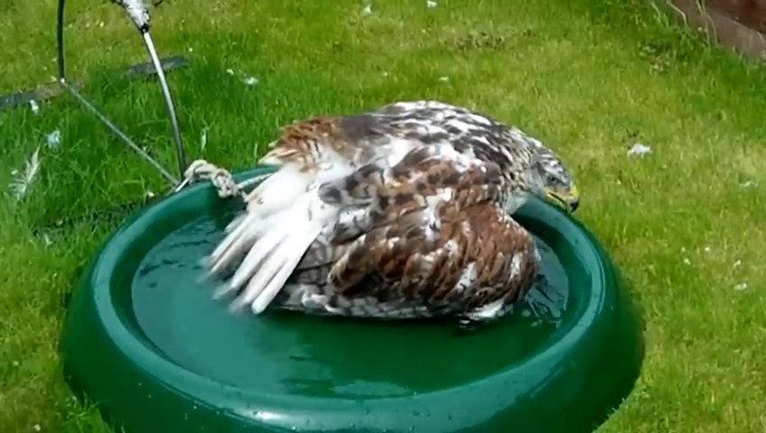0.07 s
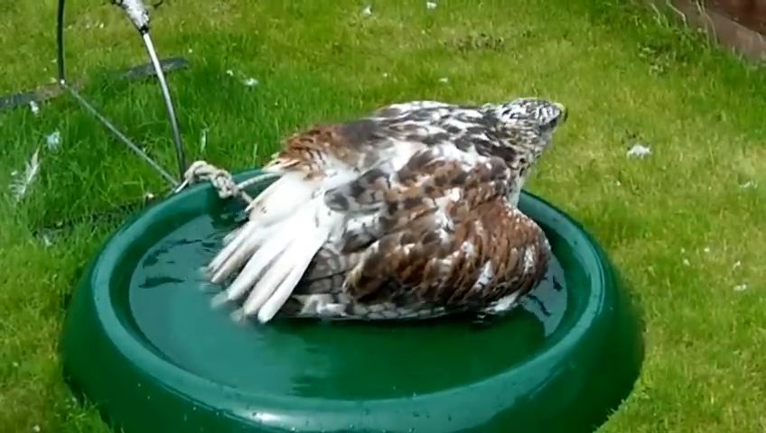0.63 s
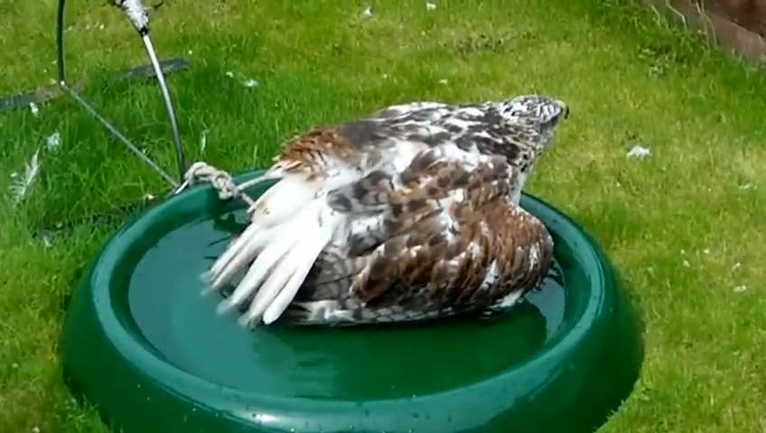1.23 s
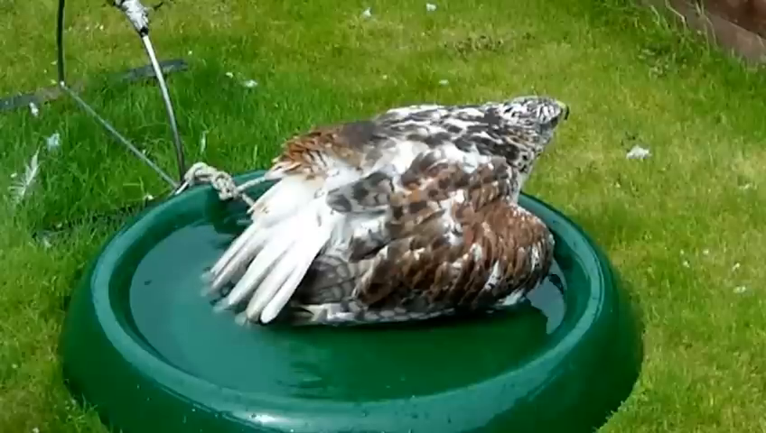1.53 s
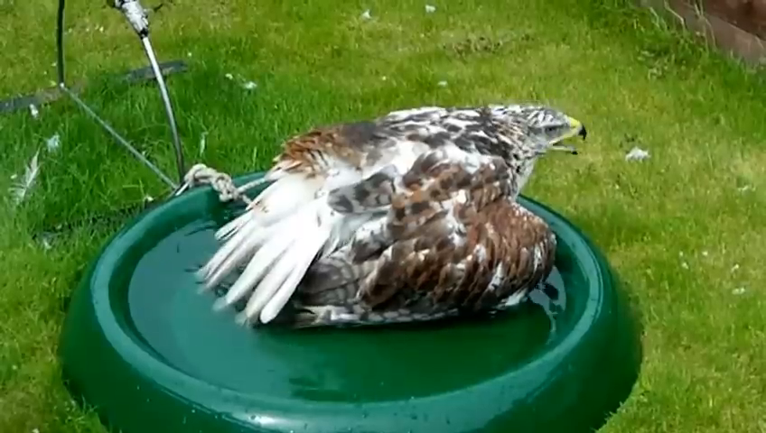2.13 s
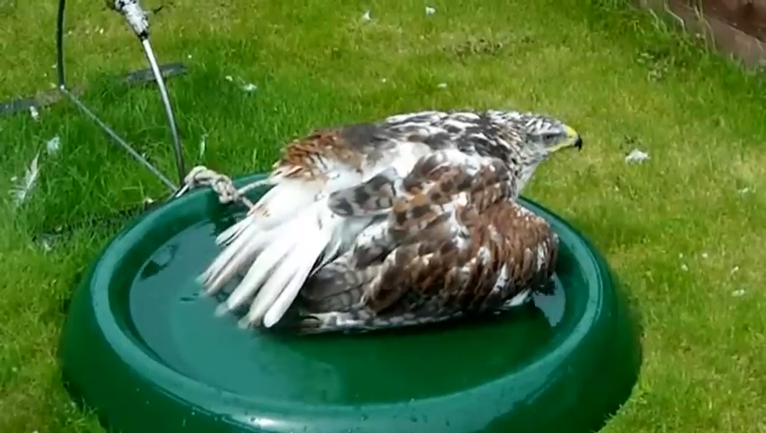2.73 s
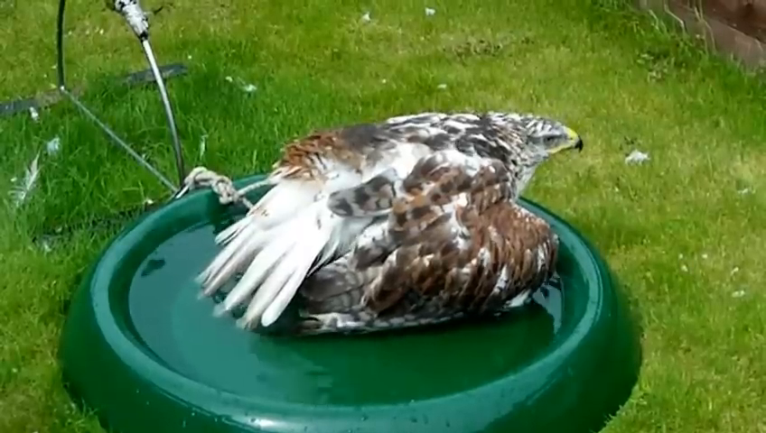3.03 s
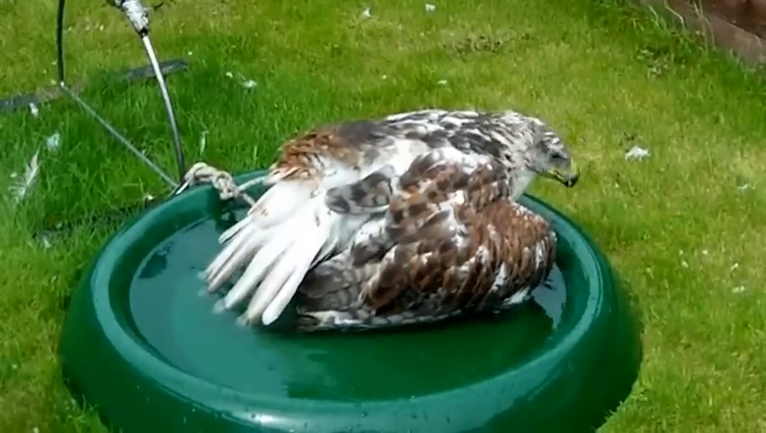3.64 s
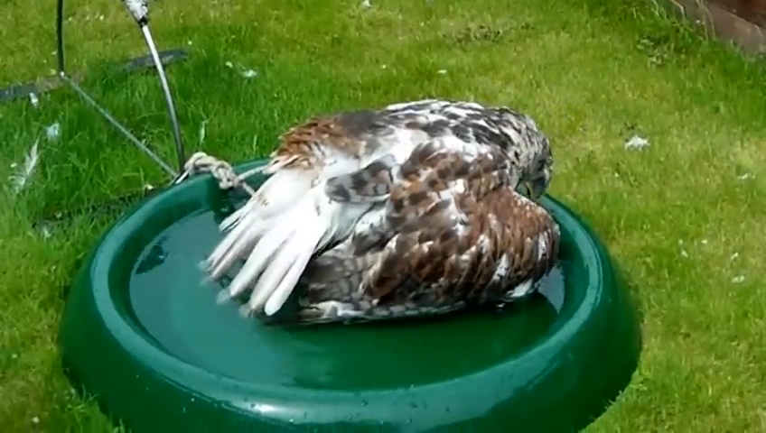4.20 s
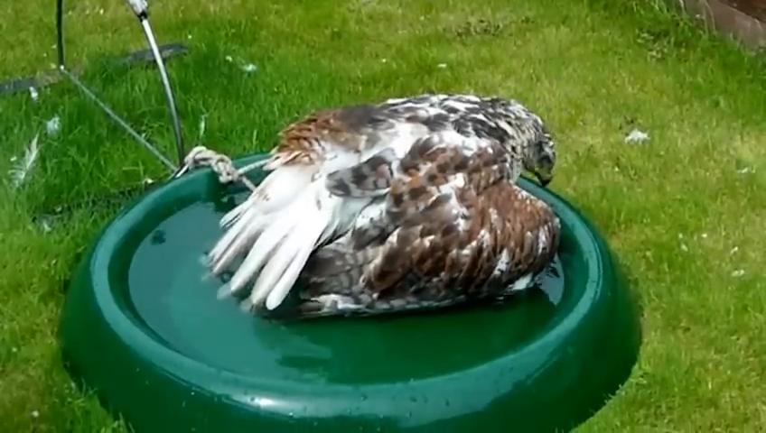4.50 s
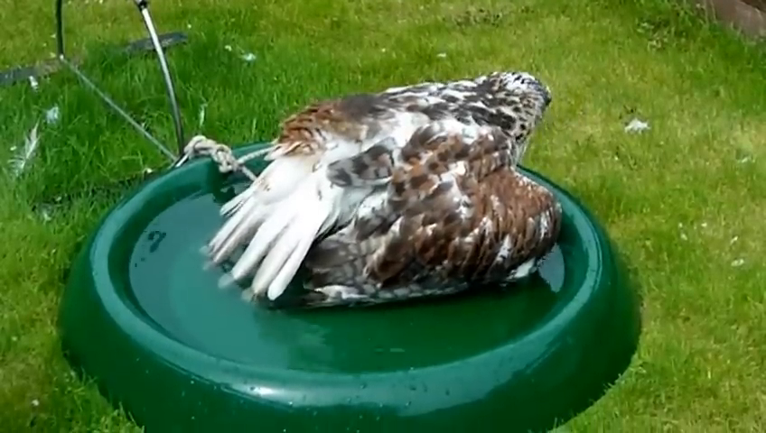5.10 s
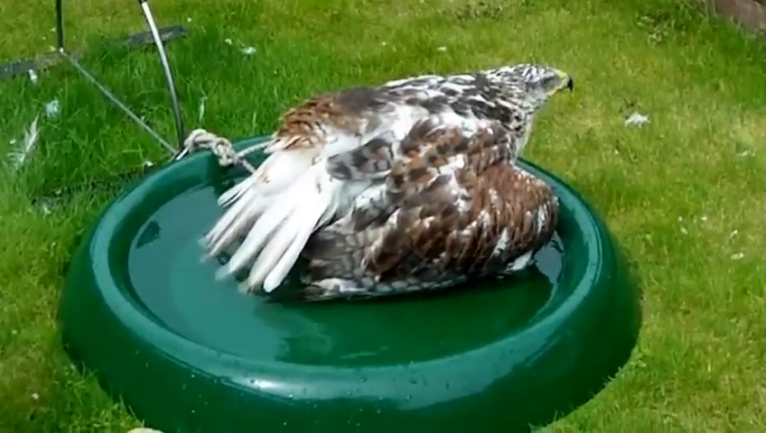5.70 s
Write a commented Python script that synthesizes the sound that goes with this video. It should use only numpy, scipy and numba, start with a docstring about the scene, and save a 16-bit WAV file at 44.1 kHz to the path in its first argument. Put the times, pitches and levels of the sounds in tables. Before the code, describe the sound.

A hawk calls four times on a garden lawn. Each call is a thin, high squeal that rises, turns raspy and breaks about an octave down into a short, loud yelp. Just after the second call a small songbird gives one faint, buzzy chirp. The hawk sounds close and clear, with a slight quick echo, over a faint steady open-air hiss and low rumble.

```python
"""A hawk calls four times from a bath on a garden lawn. Each call is a thin rising squeal that doubles
its period, turns to a rasp and breaks about an octave down into a short loud yelp. A small songbird
chirps once, a whistle with a buzzing tail. Fence and house throw the calls back over a bed of faint
open-air hiss and low rumble."""
import sys
import numpy as np
from scipy import signal
from scipy.fft import rfft, irfft, next_fast_len
from scipy.io import wavfile
from numba import njit

SR = 44100
rng = np.random.default_rng(int(sys.argv[2]) if len(sys.argv) > 2 else 0)


def dump(signal):
    """Clip the signal to [-1, 1] and save it as 16-bit WAV at the path in sys.argv[1]."""
    limited = np.clip(np.atleast_2d(signal).T, -1, 1)
    pcm = np.round(limited * 32767).astype(np.int16)
    wavfile.write(sys.argv[1], SR, pcm)


N = 262395
T = np.arange(N) / SR


def hawk():
    """Four calls from one throat, each a squeal, a register break and a yelp."""
    textures = call_textures()
    out = np.zeros(N)
    for call in zip(SQUEALS, DOUBLINGS, RASPS, OCTAVES, SHRILLS):
        out += squeal(*call, textures)
    for break_row, yelp_row in zip(BREAKS, YELPS):
        out += register_break(break_row, yelp_s=yelp_row[0]) + yelp(yelp_row, textures["jitter"])
    return out


# pitch and level envelope of each squeal: t/s, f/Hz, level/dB
SQUEAL_1 = [(0.115, 2704, -52), (0.141, 2830, -41.5), (0.219, 3087, -30.5), (0.247, 3102, -25),
            (0.265, 3254, -18.5), (0.315, 3450, -23.5), (0.345, 3753, -29), (0.366, 3414, -36)]
SQUEAL_2 = [(1.974, 2617, -52), (2.018, 2625, -48), (2.056, 2754, -56), (2.122, 2838, -40.5),
            (2.172, 3036, -53), (2.242, 3090, -28.5), (2.256, 3240, -38.5), (2.324, 3744, -26.5),
            (2.348, 3660, -37)]
SQUEAL_3 = [(3.159, 2615, -55), (3.211, 2630, -51.5), (3.295, 2914, -43), (3.341, 3226, -52),
            (3.371, 3226, -35.5), (3.469, 3669, -20.5), (3.499, 3788, -33), (3.519, 3770, -20.5),
            (3.538, 3900, -53)]
SQUEAL_4 = [(4.097, 2804, -48), (4.149, 2806, -36), (4.191, 3053, -41), (4.213, 3139, -25.5),
            (4.275, 3368, -32), (4.299, 3700, -25), (4.329, 4150, -36), (4.355, 4090, -28),
            (4.374, 3920, -38)]
SQUEALS = SQUEAL_1, SQUEAL_2, SQUEAL_3, SQUEAL_4
# period doubling, which adds half-tones at 1.5 and 0.5 times the pitch:
# fully in t/s, attack/s, level/dB, fade/(dB/s), lower half-tone re upper/dB, phase slip/turns
DOUBLINGS = [(.27, 0.038, -34, 110, -18, .05), (2.203, 0.02, -41, 74, -6, .035),
             (3.385, 0.074, -41.5, 89, -10.5, 0.054), (4.3, 0.045, -46, 45, -16, 0.12)]
# rasp up to the break: fully in t/s, first level/dB, last level/dB, roughness/(0-1)
RASPS = [(.215, -40.5, -36.5, 0.76), (2.27, -41, -39, 0.8), (3.415, -44, -34.5, 0.65),
         (4.295, -39, -49, .9)]
# octave overtone: brightest t/s, first level/dB, brightest level/dB, last level/dB
OCTAVES = [(.245, -59, -43, -62), (2.315, -62, -43, -58), (3.47, -55.5, -40.5, -55), (4.25, -54, -32, -87)]
# shrill top layer: fully in t/s, first level/dB, level at the octave's peak/dB, last level/dB
SHRILLS = [(.2, -57, -47.5, -64), (2.19, -53, -45.5, -59), (3.35, -56, -50, -51), (4.205, -56, -57, -70)]


def squeal(curve, doubling_row, rasp_row, octave_row, shrill_row, textures,
           waver_share=.0037, strain_share=.0034, jitter_share=.03, shimmer_share=1.1,
           flutter_db=3, rush_db=-5, hoarse_db=7):
    """High register of the syrinx: a whistle whose cycles alternate, then scatter as pressure grows."""
    doubling_s, attack_s, half_db, fade_db_per_s, lower_db, slip_turns = doubling_row
    rasp_s, *rasp_db, roughness = rasp_row
    brightest_s, *octave_db = octave_row
    shrill_s, *shrill_db = shrill_row
    start_s, end_s = curve[0][0], curve[-1][0]
    hz, db = controls(curve)
    # layer envelopes
    doubled = ramp(doubling_s - attack_s, attack_s)
    half = doubled * undb(half_db - fade_db_per_s * (T - doubling_s))
    rasp = fade_in(rasp_s, .036) * undb(np.interp(T, [rasp_s, end_s], rasp_db))
    octave = undb(np.interp(T, [start_s, brightest_s, end_s], octave_db))
    shrill = fade_in(shrill_s, .018) * undb(np.interp(T, [shrill_s, brightest_s, end_s], shrill_db))
    # the rasp shakes the whistle's pitch and level
    grit = np.minimum(rasp / undb(db), .4)
    jitter = jitter_share * roughness * grit * textures["jitter"]
    shimmer = shimmer_share * roughness * grit * textures["shimmer"]
    waver = (waver_share + strain_share * doubled) * textures["waver"]
    phase = turn(hz * (1 + waver + jitter))
    # the alternating cycles lock only loosely, so the half-tones are hoarser than the whistle
    slip = 2 * np.pi * slip_turns * textures["slip"]
    halves = np.sin(1.5 * (phase + slip)) + undb(lower_db) * np.sin(.5 * (phase + slip))
    top = shrill_partials(hz, phase + doubled * slip / 2, doubled)
    partials = octave * np.sin(2 * phase) + half * halves + shrill * top
    tone = undb(db) * np.sin(phase) + undb(flutter_db * textures["flutter"]) * partials
    # rasp smears the top partials into a hiss of the throat's colour
    hoarse = undb(hoarse_db) * grit * shrill * textures["hiss"]
    rush = undb(rush_db) * rasp * textures["rush"]
    voice = np.sqrt(2) * tone * (1 + shimmer) + hoarse + rush
    return voice * gate(start_s, end_s, .008, .0026)


# the throat's EQ on the top layer: f/Hz, gain/dB
THROAT = [(4500, -30), (6500, -12), (7700, 7), (8400, 6), (9500, -4.5), (10500, -9), (12800, -20),
          (13600, -14), (15000, -28)]


def shrill_partials(hz, phase, doubled):
    """Top partials shaped by the throat; half-tones fill the gaps once the period doubles."""
    multiples = np.arange(2.5, 5, .5)[:, None]
    throat_hz, throat_db = np.transpose(THROAT)
    weights = undb(np.interp(multiples * hz, throat_hz, throat_db))
    weights *= np.where(multiples % 1 > 0, doubled, 1)
    return np.sum(weights * np.sin(multiples * phase), axis=0) / np.linalg.norm(weights, axis=0)


# air rushing through the open beak: f/Hz, relative level/dB
BEAK = [(1200, -39), (2000, -15), (2700, 0.5), (3200, -1), (3650, -2.5), (4400, -8.5), (5500, -5),
        (7000, -24.5), (9500, -38), (11500, -32), (15000, -28)]


def call_textures():
    """Breath noise from beak and throat, and the random modulators that roughen the voice."""
    return dict(rush=noise(BEAK), hiss=noise(THROAT), jitter=wobble(504), shimmer=wobble(190),
                waver=wobble(83), slip=wobble(200), flutter=wobble(44.6))


# ragged lead-in to each yelp: length/s, first f/Hz, last f/Hz, last level/dB, noise width/Hz
BREAKS = [(.04, 2680, 2580, -36.5, 77), (0.038, 2600, 2050, -34.5, 320), (.12, 2750, 2150, -37, 190),
          (.016, 3100, 2750, -35.5, 360)]


def register_break(row, yelp_s, swell_db=9, plunge_power=2.6):
    """Between registers the syrinx vibrates chaotically round a sinking pitch, swelling to the yelp."""
    length_s, first_hz, last_hz, level_db, width_hz = row
    progress = fade_in(yelp_s, length_s)
    phase = turn(first_hz + (last_hz - first_hz) * progress ** plunge_power)
    envelope = undb(level_db - swell_db * (1 - progress)) * gate(yelp_s - length_s, yelp_s, .016, .0035)
    return (wobble(width_hz) * np.cos(phase) + wobble(width_hz) * np.sin(phase)) * envelope


# the yelp ending each call: t/s, attack/s, length/s, first f/Hz, last f/Hz, level/dB, relative octave/dB
YELPS = [(0.372, 0.004, 0.036, 1800, 1966, -15.5, -7.5), (2.352, 0.016, .021, 1753, 1873, -14.5, -9.5),
         (3.541, 0.0069, .033, 1811, 1937, -17.5, -9.5), (4.376, 0.016, 0.021, 2013, 2124, -15, -3.5)]
# the yelp's bite at its hardest: harmonic number, relative level/dB
YELP_OVERTONES = [(3, -25), (4, -49), (5, -46), (6, -39)]


def yelp(row, jitter, swell_db=8.5, arch_power=1.61, jitter_share=.001, crack_share=.038, settle_s=.003,
         hardest_s=.013, bite_width_s=.0071, mellow_db_per_s=50):
    """Low register: starts with a crack, is briefly bright, and arches up into a clean hoot."""
    start_s, attack_s, length_s, first_hz, last_hz, level_db, octave_db = row
    opening = np.sin(np.pi / 2 * gate(start_s, start_s + length_s, .0026, .0094)) ** 2
    age = T - start_s
    hz = last_hz + (first_hz - last_hz) * (1 - ramp(start_s, length_s)) ** arch_power
    db = level_db - swell_db * (1 - ramp(start_s, attack_s))
    crack = crack_share * np.exp(-np.abs(age) / settle_s)
    phase = turn(hz * (1 + (jitter_share + crack) * jitter))
    octave = undb(octave_db - mellow_db_per_s * (age - hardest_s)) * np.sin(2 * phase)
    overtones = sum(undb(part_db) * np.sin(k * phase) for k, part_db in YELP_OVERTONES)
    bite = np.exp(-((age - hardest_s) / bite_width_s) ** 2)
    return np.sqrt(2) * (np.sin(phase) + octave + bite * overtones) * undb(db) * opening


# the songbird's rising whistle: t/s, f/Hz, level/dB
CHIRP = [(2.497, 4100, -54), (2.518, 5210, -52), (2.541, 6980, -54), (2.554, 7120, -55),
         (2.574, 6650, -47.5), (2.589, 6800, -46)]
# sidebands of the buzz, above the whistle: multiple of the beat rate, relative level/dB
BUZZ = [(1, -0.5), (2, -8), (3, -10.5), (4, -27), (5, -25)]


def songbird(buzz_length_s=.041, carrier_hz=6380, glide_hz_per_s=8800, carrier_db=-39.5,
             beat_hz=420, beat_rise_hz_per_s=7400, sidebands_db=1,
             octave_db=-2, buzz_octave_db=-7, octave_sidebands_db=-10, jitter_share=.0049):
    """A rising whistle that ends in a quickening buzz as the second side of the syrinx joins in."""
    hz, db = controls(CHIRP)
    start_s, buzz_s = CHIRP[0][0], CHIRP[-1][0]
    crossfade = ramp(buzz_s, .0044)
    buzz_age = buzz_length_s * ramp(buzz_s, buzz_length_s)
    hz += crossfade * (carrier_hz + glide_hz_per_s * buzz_age - hz)
    db += crossfade * (carrier_db - db)
    octave = undb(octave_db + crossfade * (buzz_octave_db - octave_db))
    phase = turn(hz * (1 + jitter_share * wobble(486)))
    beat = turn(beat_hz + beat_rise_hz_per_s * buzz_age)
    buzz = crossfade * sum(undb(sidebands_db + side_db) * np.exp(1j * k * beat) for k, side_db in BUZZ)
    tone = np.exp(1j * phase) * (1 + buzz)
    tone += octave * np.exp(2j * phase) * (1 + undb(octave_sidebands_db) * buzz)
    return np.sqrt(2) * tone.imag * undb(db) * gate(start_s, buzz_s + buzz_length_s, .0052, .0031)


# slapback from fence and house: delay/s, level/dB
ECHOES = [(.0125, -7.5), (0.0254, -19.5), (.049, -14), (.076, -22.5)]


def garden(x, t60_s=.46, tail_db=-16, predelay_s=.015, damping_hz=7500):
    """A few clear echoes and a short scattered tail; grass and hedges take their treble."""
    t = T[:SR // 2]
    tail = rng.standard_normal(len(t)) * undb(-60 * t / t60_s) * (t > predelay_s)
    response = undb(tail_db) * tail / np.linalg.norm(tail)
    for delay_s, db in ECHOES:
        response[int(delay_s * SR)] += undb(db)
    response = signal.sosfilt(signal.butter(1, damping_hz, fs=SR, output="sos"), response)
    return x + signal.fftconvolve(x, response)[:N]


# colour of the open-air hiss: f/Hz, relative level/dB
AIR = [(53, -9.5), (90, -3), (179, -4), (262, -2.5), (394, -3), (420, -2.5), (592, -1), (718, -2),
       (1030, 0.5), (2010, -5.5), (2230, -4.5), (2540, -6.5), (5720, -15), (7890, -20), (15000, -29.5)]
# the hiss eases a little half-way: t/s, level/dB
HISS_LEVEL = [(2.6, -47), (3.6, -48)]
# colour of the low rumble: f/Hz, relative level/dB
RUMBLE = [(10, -9), (25, 4.5), (42, 4), (54, 8.5), (66, 2.5), (95, -17.5), (160, -58)]


def open_air(flicker_db=.3, rumble_db=-60, swell_at_s=1.72, swell_width_s=.22, swell_db=7):
    """The ambience bed: even distant hiss over a low rumble with one soft swell."""
    hiss = noise(AIR) * undb(controls(HISS_LEVEL)[0] + flicker_db * wobble(26))
    swell = np.exp(-((T - swell_at_s) / swell_width_s) ** 2)
    return hiss + noise(RUMBLE) * undb(rumble_db + swell_db * swell)


def undb(db):
    """Decibels to gain."""
    return 10 ** (np.asarray(db) / 20)


def unit(x):
    """Scale to rms 1."""
    return x / np.sqrt(np.mean(x ** 2))


def controls(table):
    """Breakpoint envelopes at every sample, one for each column after the time."""
    times, *columns = np.transpose(table)
    return [np.interp(T, times, column) for column in columns]


def ramp(start_s, length_s):
    """Rises from 0 to 1 and stays there."""
    return np.clip((T - start_s) / length_s, 0, 1)


def fade_in(full_s, length_s):
    """A ramp that reaches 1 at full_s."""
    return ramp(full_s - length_s, length_s)


def gate(start_s, end_s, rise_s, fall_s):
    """Open between two times, with soft edges."""
    return fade_in(start_s, rise_s) * (1 - ramp(end_s, fall_s))


def noise(spectrum):
    """Noise of rms 1 coloured by f/Hz, level/dB points."""
    hz, db = np.transpose(spectrum)
    size = next_fast_len(N)
    bins_hz = np.maximum(np.fft.rfftfreq(size, 1 / SR), 1)
    gain = undb(np.interp(np.log(bins_hz), np.log(hz), db))
    return unit(irfft(rfft(rng.standard_normal(size)) * gain, size)[:N])


def wobble(hz):
    """Random modulator of rms 1, low-passed at hz."""
    return unit(signal.sosfilt(signal.butter(2, hz, fs=SR, output="sos"), rng.standard_normal(N)))


def turn(hz):
    """Running phase of an oscillator."""
    return 2 * np.pi * np.cumsum(hz) / SR


@njit
def follow(x, attack, release):
    """Peak follower, quick up and slow down."""
    envelope, level = np.empty(len(x)), 0.
    for i in range(len(x)):
        level += (abs(x[i]) - level) * (attack if abs(x[i]) > level else release)
        envelope[i] = level
    return envelope


def scene():
    """Both birds in the garden over the ambience bed, in mono."""
    return (garden(hawk() + songbird()) + open_air())[None]


def record(dry, notch_hz=7850, notch_width_hz=450, notch_depth=.47,
           limit_db=-12, attack_s=.00023, release_s=.11, top_hz=15220):
    """The microphone has a narrow dip in the treble; a limiter leans on the yelps; the top is cut."""
    notched = signal.lfilter(*signal.iirnotch(notch_hz, notch_hz / notch_width_hz, fs=SR), dry)
    coloured = dry + notch_depth * (notched - dry)
    envelope = follow(coloured[0], 1 / (attack_s * SR), 1 / (release_s * SR))
    limited = coloured / np.maximum(envelope / undb(limit_db), 1)
    return signal.sosfilt(signal.ellip(12, .1, 80, top_hz, fs=SR, output="sos"), limited)


dry = scene()
out = record(dry)
dump(out)
```